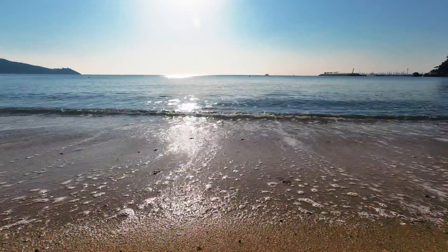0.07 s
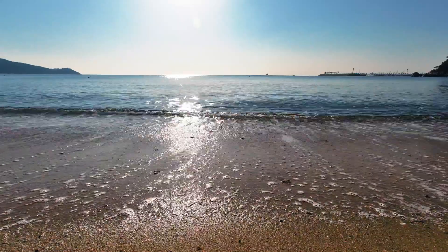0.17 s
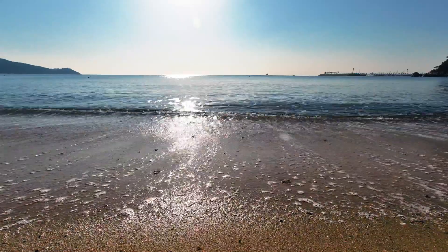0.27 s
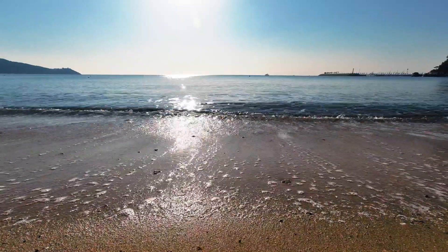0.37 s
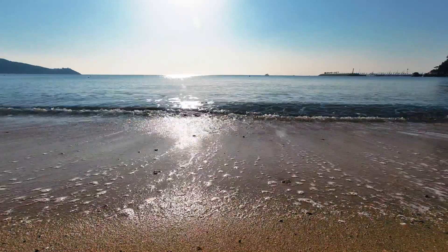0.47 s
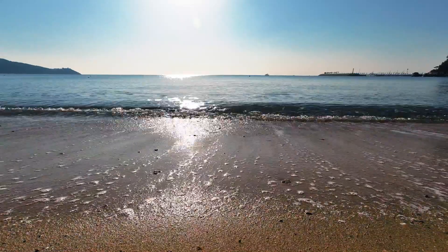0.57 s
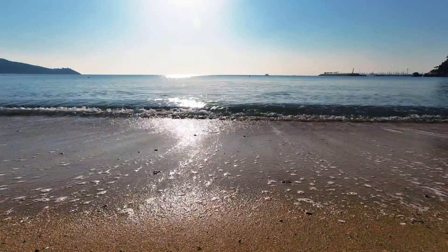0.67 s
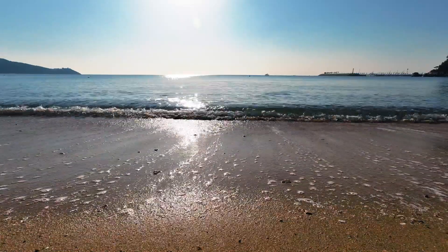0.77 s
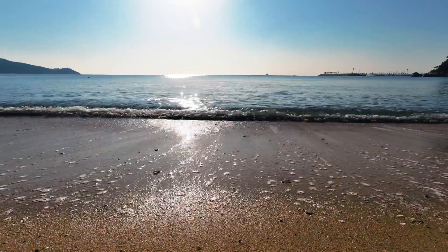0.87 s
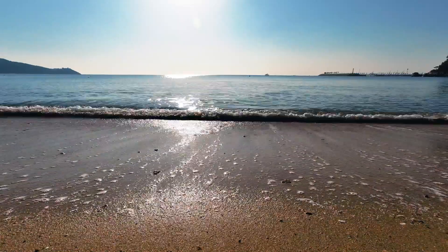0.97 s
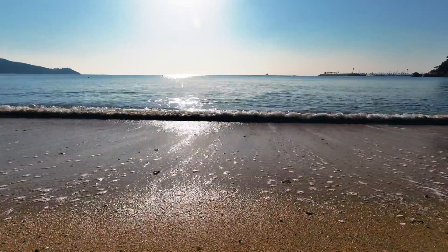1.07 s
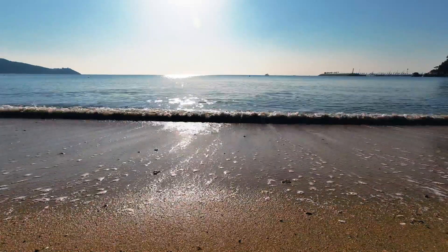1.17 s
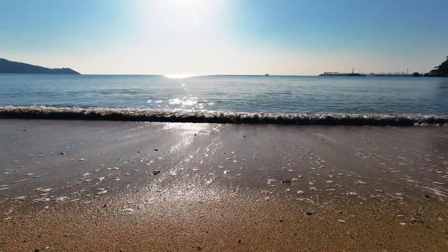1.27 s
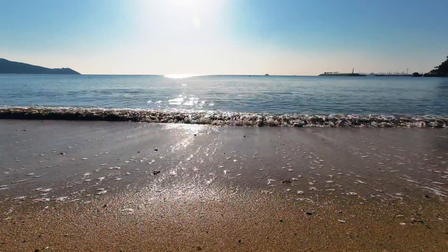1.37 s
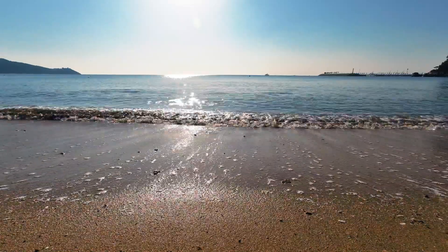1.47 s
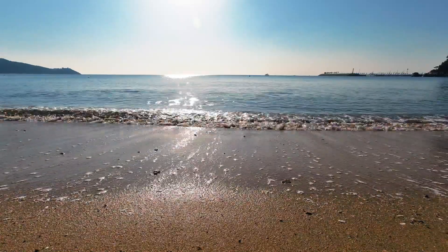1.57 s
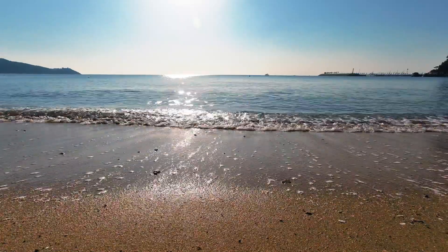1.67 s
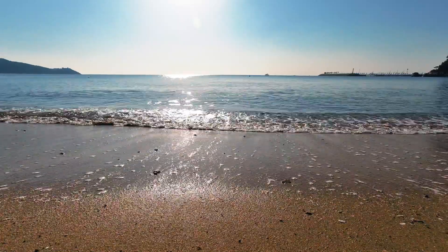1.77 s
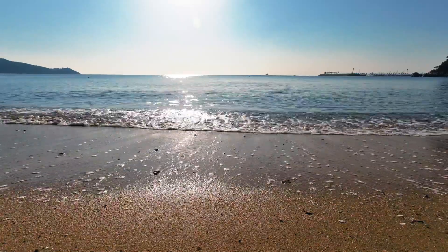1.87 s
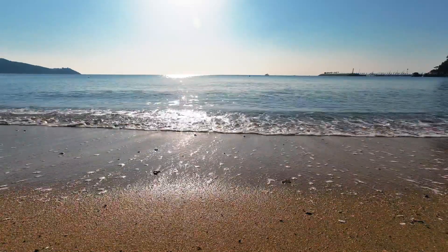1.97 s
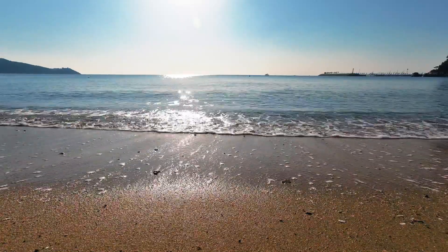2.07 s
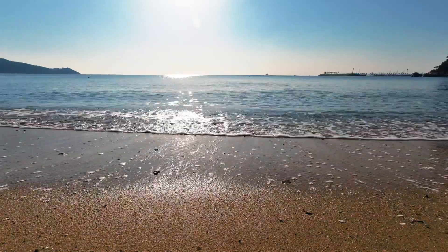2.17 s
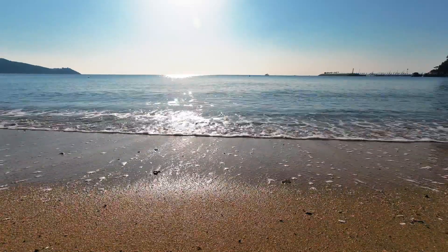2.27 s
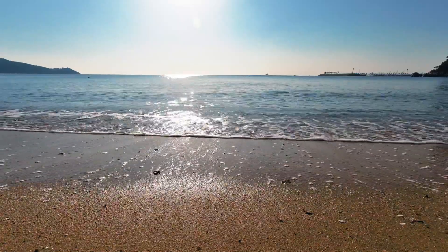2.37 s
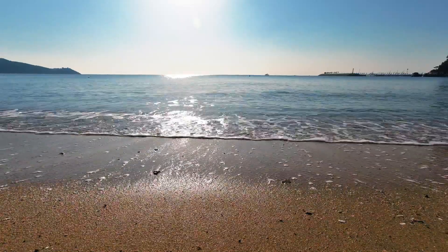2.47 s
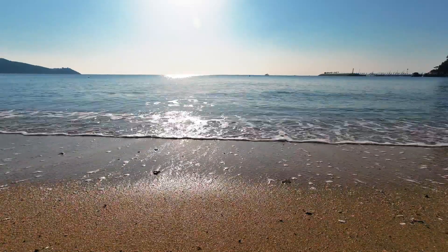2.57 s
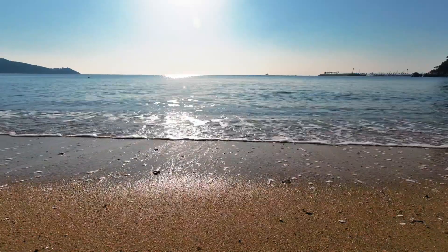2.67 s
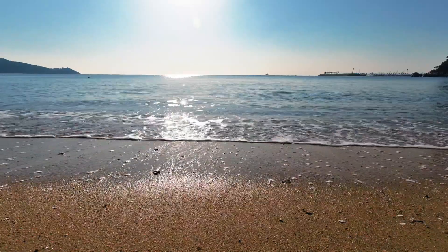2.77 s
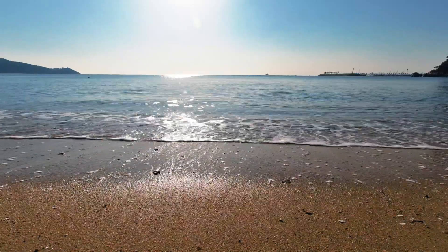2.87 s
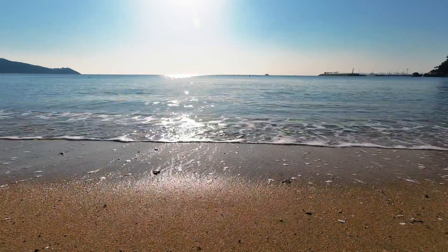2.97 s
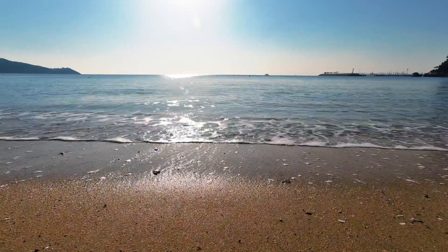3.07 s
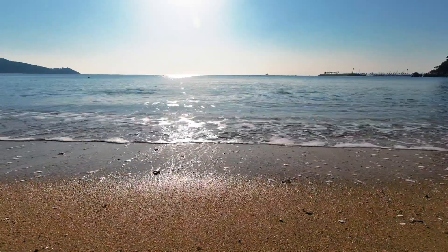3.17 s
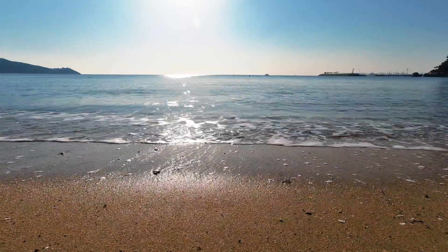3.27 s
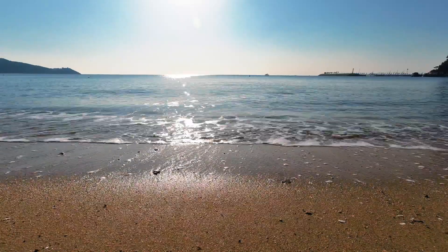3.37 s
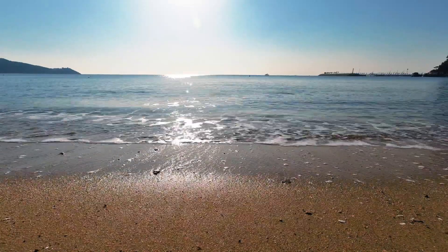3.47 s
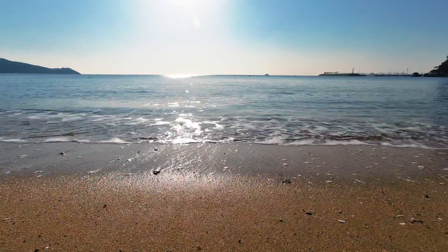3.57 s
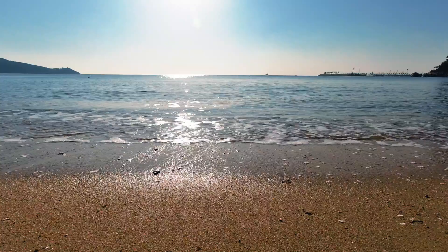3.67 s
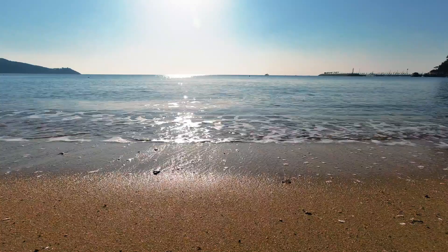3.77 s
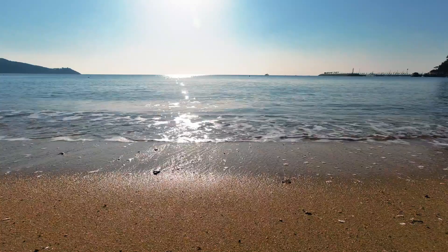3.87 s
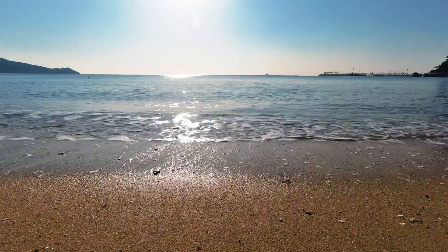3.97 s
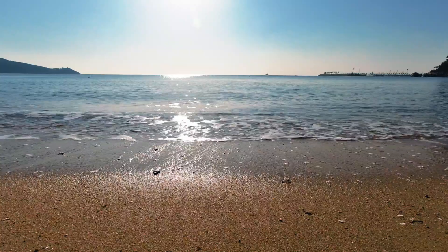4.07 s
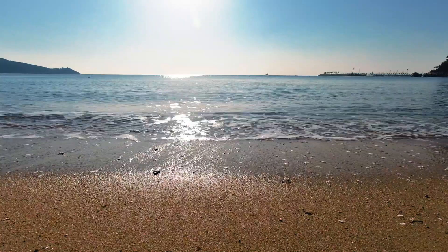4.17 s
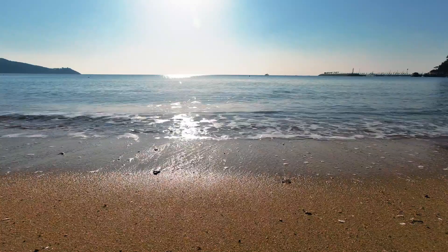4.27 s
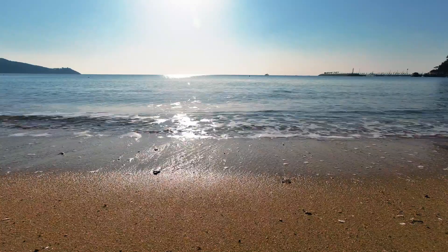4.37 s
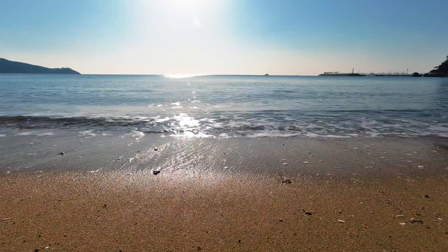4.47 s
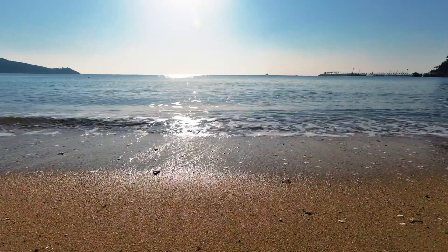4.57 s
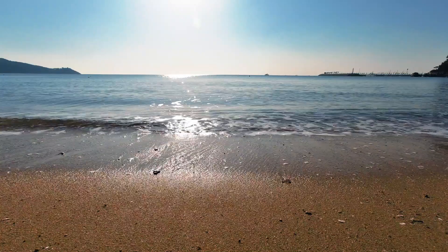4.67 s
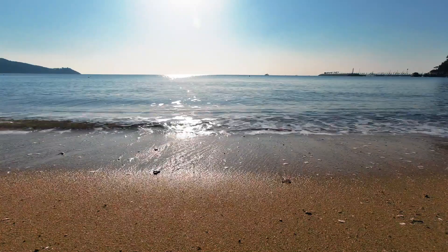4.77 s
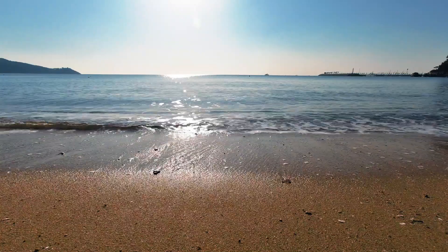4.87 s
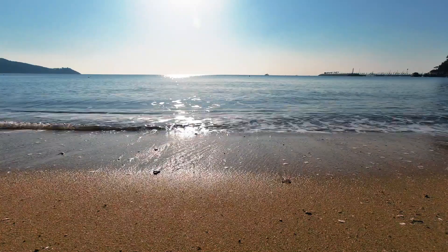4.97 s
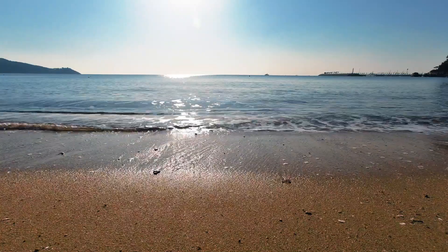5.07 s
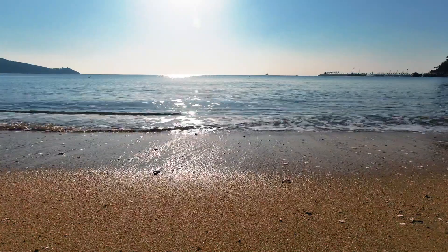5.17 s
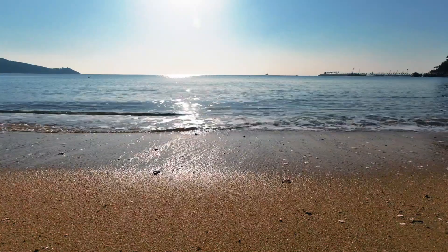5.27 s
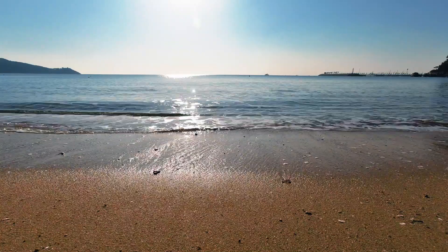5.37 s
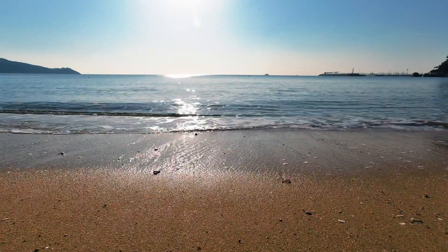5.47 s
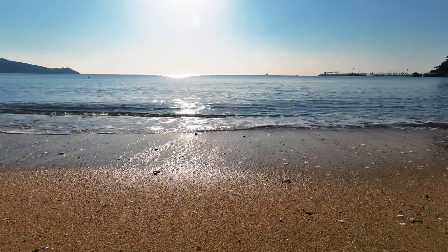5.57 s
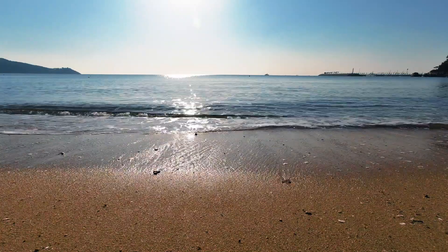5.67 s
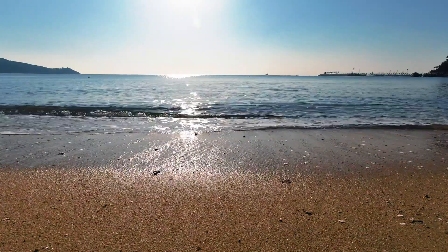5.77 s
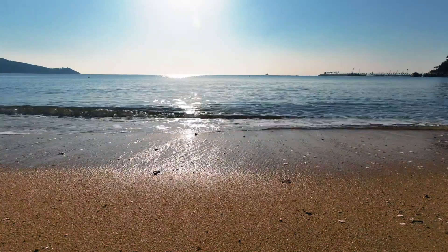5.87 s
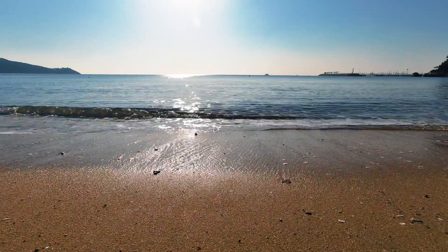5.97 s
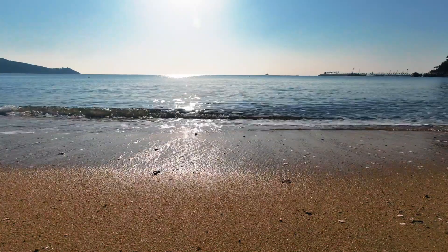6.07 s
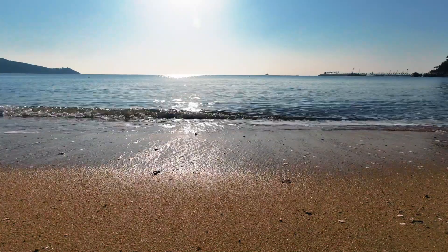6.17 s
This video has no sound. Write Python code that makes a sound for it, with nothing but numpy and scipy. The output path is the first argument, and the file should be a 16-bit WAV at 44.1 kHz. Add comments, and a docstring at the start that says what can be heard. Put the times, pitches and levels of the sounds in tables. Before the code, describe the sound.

A close stereo view of small waves on an open sandy beach. From 0 s a bubbling rush of water grows, mostly left of centre, swelling unevenly to a full tumbling break between about 1 and 1.6 s. Near 1.4 s there is a deep gulp and a bright burst of spray. The crash falls away rapidly by 2 s, and from about 2.2 to 4.5 s it is quiet: fine foam fizzes on wet sand over a soft low sea rumble and barely noticeable wind, with faint small plops near 3.55 and 3.8 s. At 4.65 s a cluster of hollow plops announces the next wavelets. From 5.1 s they lap and churn in overlapping splashes, moving to the right then back left, with rounder plops around 5.7, 6.0 and 6.2 s. The water is still breaking when it ends.

```python
"""Churning bubbles and bursts of spray come first, as small waves break on a sandy beach before two close ports.
Each surge swells and dies; swarms of rising bubble tones over hiss make its churn, shaped by colour and lumps.
Under it the sea rumbles and a light wind touches the ports, both filtered noise; left-over foam fizzes on the
sand, a finer bubble swarm. Later air pockets plop: decaying rising tones, each with a rough noise splash."""
import sys
import numpy as np
from scipy import signal
from scipy.io import wavfile
from scipy.ndimage import uniform_filter1d

SR = 44100
rng = np.random.default_rng(int(sys.argv[2]) if len(sys.argv) > 2 else 0)


def bounce(signal):
    """Save signal as a 16-bit WAV file at the path given by the first command-line argument."""
    frames = np.transpose(np.atleast_2d(signal))
    limited = np.clip(frames, -1, 1)
    pcm = np.round(limited * 32767).astype(np.int16)
    wavfile.write(sys.argv[1], SR, pcm)


def voltage_ratio(level):
    """Linear amplitude factor for a level in decibels (scalar or array-like)."""
    return 10 ** (np.asarray(level, float) / 20)


N = 274743

# where the surf sounds from: time_s, left_lead_ms [left end reaches the left port first], left_share [0-1]
SHORE_ENDS = [(0, 0.065, 0.82), (1.3, 0.047, 0.59), (1.9, 0.064, 1), (2.3, .077, 0.85), (3.4, 0.14, 0.82),
              (4.85, 0.16, .97), (4.95, 0.14, 0.1), (5.7, .12, .11), (5.82, .09, 0.69), (6.23, 0.086, 0.58)]
RIGHT_LEAD_MS = 0.093  # the right end reaches the right port first
UNIT_RMS = 13.9  # rms of a sound whose short-time spectra have unit power


def even(x):
    """Scales to rms 1."""
    return x / np.sqrt(np.mean(abs(x) ** 2) + 1e-20)


def colour(points, hz):
    """Gain of a spectrum table, drawn over log frequency, unit power over the band."""
    f, db = np.transpose(points)
    return even(voltage_ratio(np.interp(np.log(hz + 1), np.log(f + 1), db)))


def curves(rows, t):
    """Every column of a table read at times t."""
    s, *columns = np.transpose(rows)
    return [np.interp(t, s, c) for c in columns]


def spectra(x, size):
    """Short-time spectra as (Hz column, s row, bins x frames)."""
    hz, t, z = signal.stft(x, SR, nperseg=size, noverlap=size * 3 // 4)
    return hz[:, None], t, z


def sound(z, size):
    """Back from short-time spectra."""
    return signal.istft(z, SR, nperseg=size, noverlap=size * 3 // 4)[1][..., :N]


def patches(shape, bins, frames):
    """Random hills over frequency and time, rms 1."""
    noise = rng.standard_normal(shape[::-1]).T
    return even(uniform_filter1d(uniform_filter1d(noise, bins, 0), frames, 1))


def bubbles(lo_hz, hi_hz, per_s, cycles, spread_db, hiss, size):
    """Spectra of a swarm of short rising bubble tones mixed with hiss, every band made equally strong."""
    out = np.zeros(N)
    for hz in np.geomspace(lo_hz, hi_hz, 24):
        turns = np.arange(int(3 * cycles * SR / hz)) * hz / SR
        envelope = turns * np.exp(-2.5 * turns / cycles)
        grain = np.sin(2 * np.pi * turns * (1 + 0.018 * turns)) * envelope
        born, sizes = rng.random((2, N))
        crowding = np.sqrt(hz / lo_hz)  # higher tones are born more often; per_s holds at lo_hz
        strengths = voltage_ratio(-spread_db * np.log(sizes + 0.0019))
        train = (born < per_s * crowding / SR) * strengths
        out += signal.oaconvolve(train, grain)[:N] / np.sqrt(crowding * (grain @ grain) / hz)
    hz, t, z = spectra(even(out) + 0.13 * rng.standard_normal(N), size)
    band_rms = np.sqrt((abs(z) ** 2).mean(1, keepdims=True))
    z = z / uniform_filter1d(band_rms, 3, 0)
    noise = even(spectra(rng.standard_normal(N), size)[2])
    return hz, t, np.sqrt(1 - hiss) * z + np.sqrt(hiss) * noise  # hiss is its share of the power


def ports(z, hz, lead_ms, blur_ms):
    """The left port hears the source lead_ms early; a wide source loses likeness towards the treble."""
    same = np.exp(-.5 * (2 * np.pi * hz * blur_ms / 1000) ** 2)
    random_phase = np.angle(spectra(rng.standard_normal(N), 2 * len(z) - 2)[2])
    other = abs(z) * np.exp(1j * random_phase)
    turn = np.exp(1j * np.pi * hz * lead_ms / 1000)  # half the lead at each port
    apart = np.sqrt((1 - same) / 2) * other
    both = np.sqrt((1 + same) / 2) * z
    return np.array([(both + apart) * turn, (both - apart) / turn])


def swells(rows, t):
    """Power of each row's rise and fall at times t, rows x times; round at the peak, steeper away from it."""
    s, db, rise, fall = np.array(rows).T[:4, :, None]
    before = (s - t) / np.maximum(rise, .02)
    after = (t - s) / np.maximum(fall, .02)
    return voltage_ratio(db - 20 * np.maximum(before, after) ** 1.5) ** 2


def churn(t):
    """Total power of surges and far breakers, and their power-weighted mean treble tilt."""
    # stretches of crest that tumble, each swelling and dying: peak_s, level_db, rise_s [20 dB], fall_s [20 dB],
    # treble_tilt [dB per octave]; a rise or fall under 0.02 s acts as 0.02 s
    surges = [(.13, -31.5, -1.4, 0.45, -4), (.51, -26, 0.9, 0.5, -0.55), (.84, -23, 0.52, 0.44, 1.5),
              (.99, -20.5, 0.24, 0.23, 0.05), (1.2, -21, 0.8, 0.4467, 0.4), (1.408, -22, .11, 0.3182, 2.5),
              (1.56, -21.5, 0.29, 0.3758, 0.45), (1.73, -26, 1.33, 0.1657, -0.5),
              (1.87, -38, -1.5, 0.34, 1.4), (2.06, -46, .15, 0.37, 2), (2.4, -55.5, 2, 0.75, 3.5),
              (3.54, -47.5, 0.74, .1, -2.5), (3.79, -42, 0.5, .43, -4), (4.19, -45.5, 0.46, 0, -3),
              (4.33, -46, 0.13, .16, 2), (4.57, -41, 0.29, 2.5, .7), (4.65, -32.5, -0.02, 0.3, -2.5),
              (4.93, -37.5, 0.16, -0.7, -0.3), (5.03, -40, 0.2, 1.2, 7.5), (5.151, -28, 0.1755, 0.3, 0.9),
              (5.29, -26, 0.17, 0.3, -2.5), (5.42, -26, 0.49, 0.65, 0.1), (5.73, -24, 0.04, 0.13, -1),
              (5.87, -26, .22, 0.7, 0.7), (6.14, -26, 0.51, 2.5, 0.7)]
    power, far = swells(surges, t), voltage_ratio(-54) ** 2  # breakers far along the shore: steady, untilted
    total = power.sum(0) + far
    return total, np.array(surges)[:, 4] @ power / total


def surf():
    """Bubble swarms at the two ends of the breaking crest, coloured as churn and thrown spray."""
    # spectrum of tumbling water: pitch_hz, relative_level [dB per Hz]
    churn_colour = [(50, -26.5), (90, -9.5), (150, -4), (230, 2.5), (320, 2.5), (700, 1), (1300, -2),
                    (2100, -6), (3500, -11.5), (4700, -19), (5400, -30.5), (6200, -37.5), (7000, -48.5),
                    (12000, -97.5)]
    # spray thrown up by the big crest: peak_s, level_db, rise_s [20 dB], fall_s [20 dB]; at least 0.02 s acts
    spray_bursts = [(1.02, -50, 0.23, .5), (1.3, -37.5, 0.18, 0.25), (1.41, -33, 0.16, 0.203),
                    (1.57, -35.5, 0.16, 0.236), (1.72, -41.5, 0.05, -0.3)]
    # spectrum of spray: pitch_hz, relative_level [dB per Hz]
    spray_colour = [(3000, -12), (5000, 0), (7000, -0.5), (8500, 3.5), (11000, 4), (12000, -6),
                    (15000, -44)]
    # how hollow the water falls, trapped air adds bass: time_s, bass_tilt [dB per octave]
    hollowness = [(0, -3), (1.35, -2.5), (1.43, 1), (1.75, -3), (1.95, 2), (3.5, 2), (3.8, -1.5), (4, 1),
                  (4.65, 5), (4.8, -1), (5.3, 1), (5.65, -3), (5.8, 0.9), (6.23, -0.8)]
    knee_hz = 600  # bass tilts below, treble above
    mix = 0
    for side in (1, -1):
        hz, t, z = bubbles(116.9, 9100, per_s=14, cycles=3.67, spread_db=2.5, hiss=0.73, size=512)
        left_ms, left = curves(SHORE_ENDS, t)
        power, bright = churn(t)
        bass_tilt, = curves(hollowness, t)
        octaves = np.log2(np.maximum(hz, 60) / knee_hz)
        tilt_db = bright * np.clip(octaves, 0, 3) - bass_tilt * np.minimum(octaves, 0)
        tumbling = colour(churn_colour, hz) * np.sqrt(power) * voltage_ratio(tilt_db)
        spray = colour(spray_colour, hz) * np.sqrt(swells(spray_bursts, t).sum(0))
        lumps_db = 1.9 * patches(z.shape, 5, 12) + 0.52 * patches(z.shape, 60, 6)
        # the treble comes and goes in slow patches
        lumps_db += 4.16 * np.clip(octaves - 2.2, 0, 1) * patches(z.shape, 30, 40)
        share, lead_ms = (left, left_ms) if side > 0 else (1 - left, -RIGHT_LEAD_MS)
        end = z * (tumbling + spray) * voltage_ratio(lumps_db) * np.sqrt(share)
        mix = mix + ports(end, hz, lead_ms, blur_ms=0.026)
    return sound(mix, 512) / UNIT_RMS


def foam():
    """Tiny bubbles burst all over the wet sand, so the ports agree as in a diffuse field."""
    # foam left on the sand: time_s, level_db
    foam_level = [(0, -64), (1, -59.5), (2.5, -57.5), (4, -63), (4.5, -61), (5, -66.5), (6.23, -70.5)]
    # spectrum of its fizz: pitch_hz, relative_level [dB per Hz]
    foam_colour = [(800, -6), (1500, -3.5), (2500, -6), (4000, 7.5), (5500, -4), (7000, -8.5),
                   (8500, -11.5), (10000, -26.5), (12000, -14)]
    ports_ms = 0.13  # sound's travel time from port to port
    swarm = dict(per_s=90, cycles=3, spread_db=2, hiss=.8, size=512)
    hz, t, a = bubbles(1000, 11000, **swarm)
    b = bubbles(2100, 11000, **swarm)[2]
    same = np.sinc(2 * hz * ports_ms / 1000)
    z = np.array([a, same * a + np.sqrt(1 - same ** 2) * b])
    return sound(z * colour(foam_colour, hz) * voltage_ratio(curves(foam_level, t)[0]), 512) / UNIT_RMS


def rumble():
    """The far sea and the pounding of near surges, alike at both ports, and gusty wind noise, unrelated at each."""
    # spectrum of the sea's rumble: pitch_hz, relative_level [dB per Hz]
    rumble_colour = [(12, -23.5), (20, -6.5), (45, -2), (90, -5.5), (130, -9), (180, -16), (260, -31),
                     (400, -49), (800, -88.5)]
    # spectrum of wind at the ports: pitch_hz, relative_level [dB per Hz]
    wind_colour = [(10, -8.5), (25, 8.5), (60, 3.5), (110, -12.5), (200, -10), (1000, -64.5)]
    sea_db, pound_db, pound_lag_s = -41, -17.5, 0.17  # steady sea; pounding relative to the churn, its lingering
    waver_db, wind_db, gust_db = .8, -57.5, 4.0  # waver and gusts are rms swings
    hz, t, z = spectra(rng.standard_normal((3, N)), 4096)
    slow = [uniform_filter1d(uniform_filter1d(v, 5000), 5000) for v in rng.standard_normal((2, N))]
    gusts, waver = even(slow[0]), even(slow[1])
    keep = np.exp(-1 / (pound_lag_s * SR))
    pounding = signal.lfilter([1 - keep], [1, -keep], churn(np.arange(N) / SR)[0])
    level = np.sqrt(voltage_ratio(sea_db) ** 2 + voltage_ratio(pound_db) ** 2 * pounding) * voltage_ratio(waver_db * waver)
    sea = even(sound(z[0] * colour(rumble_colour, hz), 4096)) * level
    wind = even(sound(z[1:] * colour(wind_colour, hz), 4096))
    return sea + voltage_ratio(wind_db) * voltage_ratio(gust_db * gusts) * wind


def plops():
    """Each pocket rings with rising pitch as it decays and throws a rough splash around its pitch."""
    # air pockets closing under a falling crest: start_s, level_db [ring before its 2 ms onset],
    # pitch_hz [at the start], t60_s
    pockets = [(1.392, -21.5, 1240, 0.0594), (1.42, -8, 158, 0.064), (3.549, -42, 540, 0.083),
               (3.779, -38.5, 600, 0.2), (4.647, -22, 430, .085), (4.653, -27, 200, .07),
               (4.672, -26, 540, .06), (4.682, -26, 250, .07), (5.093, -24, 231, .07),
               (5.168, -18, 1400, .02), (5.245, -22, 556, 0.013), (5.274, -24, 445, 0.022),
               (5.722, -15, 448, 0.036), (6.02, -17, 446, 0.087), (6.03, -24.5, 95.4, .2),
               (6.198, -22, 295, 0.08)]
    out, t = np.zeros(N + SR), np.arange(SR // 4) / SR
    for (s, db, hz, t60), noise in zip(pockets, rng.standard_normal((len(pockets), len(t)))):
        ring = np.sin(2 * np.pi * hz * t * (1 + 4.0 * t))
        band = signal.butter(2, [hz / 2, hz * 2], "band", fs=SR)
        splash = even(signal.lfilter(*band, noise))
        shape = voltage_ratio(db - 60 * t / t60) * (1 - np.exp(-t / .002))
        out[round(s * SR):][:len(t)] += shape * (ring + .35 * splash)
    hz, frames, z = spectra(out[:N], 512)
    left_ms, left = curves(SHORE_ENDS, frames)
    lead_ms = np.where(left > .5, left_ms, -RIGHT_LEAD_MS)  # plops come from the stronger end
    return sound(ports(z, hz, lead_ms, blur_ms=0.013), 512)


def scene():
    """All water and wind at the two ports."""
    return surf() + foam() + rumble() + plops()


def low_pass(x):
    """Removes everything above the highest recorded frequency."""
    return signal.sosfilt(signal.butter(12, 11950, fs=SR, output="sos"), x)


def record(dry):
    """The finished mix as it is stored."""
    return low_pass(dry)


dry = scene()
out = record(dry)
bounce(out)
```